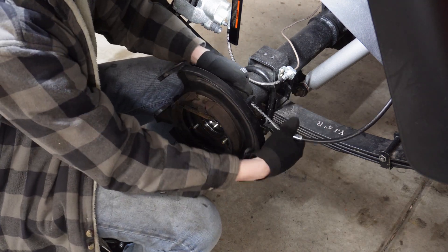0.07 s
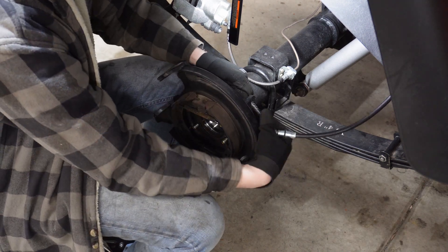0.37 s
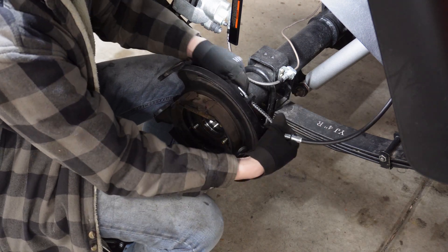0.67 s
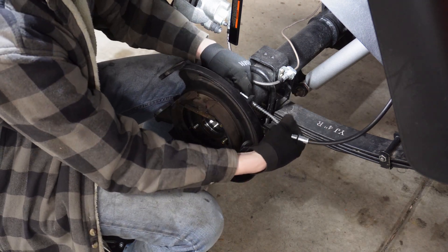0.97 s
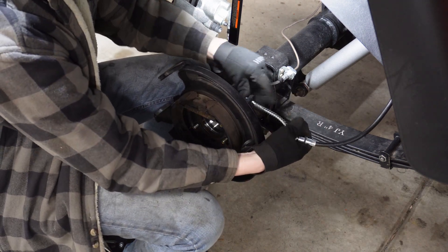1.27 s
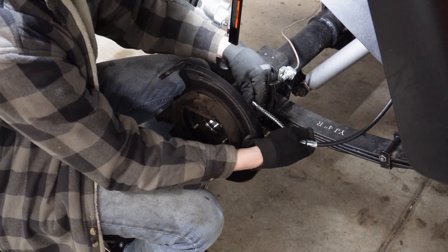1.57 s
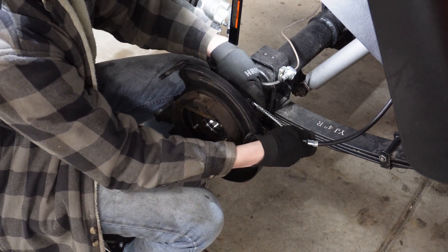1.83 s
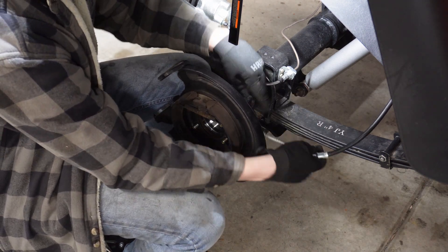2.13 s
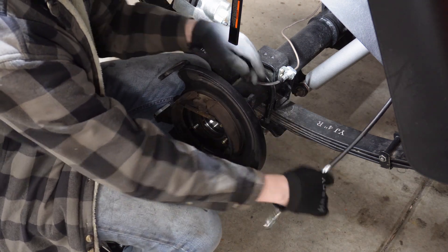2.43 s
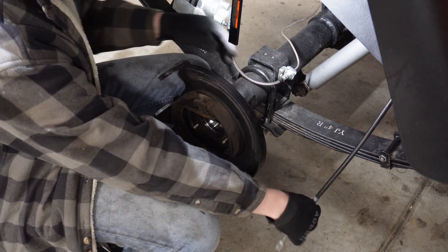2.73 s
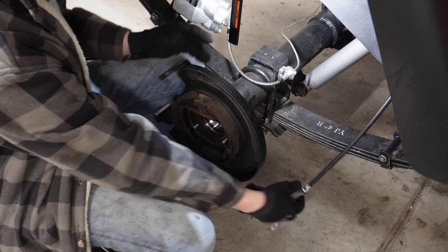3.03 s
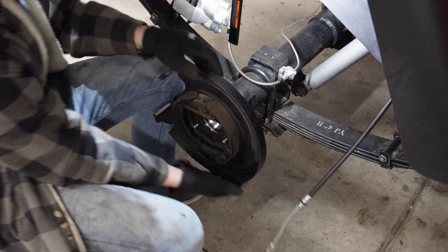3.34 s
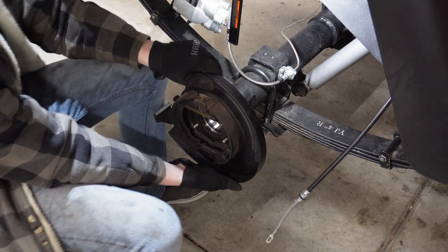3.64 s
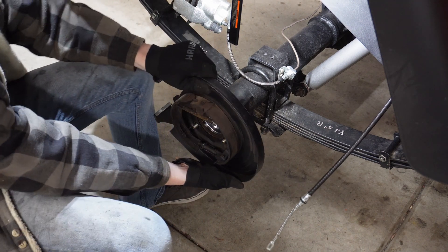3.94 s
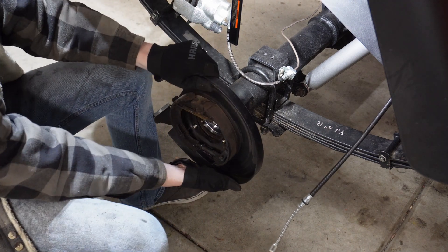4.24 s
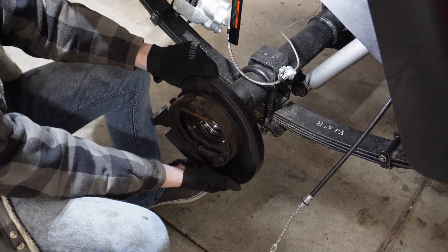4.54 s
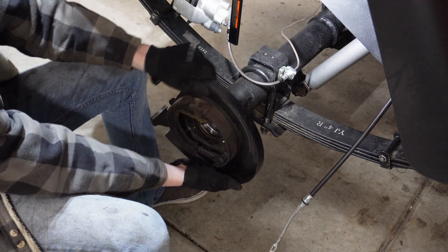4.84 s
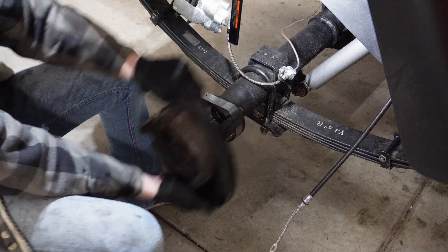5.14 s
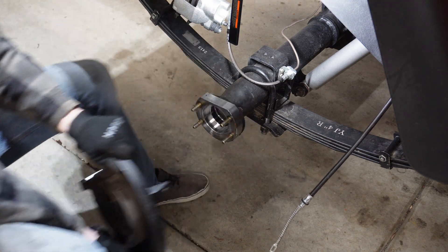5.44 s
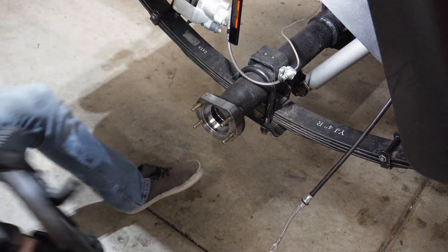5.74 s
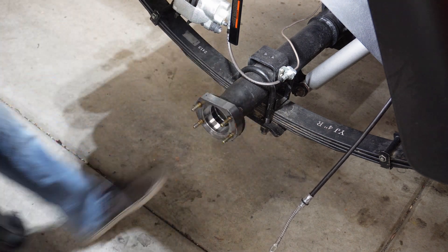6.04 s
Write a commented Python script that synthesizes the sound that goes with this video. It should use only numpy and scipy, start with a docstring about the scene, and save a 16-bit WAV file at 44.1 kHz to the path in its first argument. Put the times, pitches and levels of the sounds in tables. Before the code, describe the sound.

Light metal clicks, a sharp rasp and a dull bump, then bursts of steel clanking and a gritty footstep in a garage.

```python
"""A mechanic kneels in a garage, working a brake cable out of a steel backing plate. The end fitting
clicks and jingles on the plate; at 2 s the clip snaps free, the cable rasps through its hole, and a hollow
panel takes a dull bump. He shifts with a rustle and a scuff, then from 3.9 s rocks the plate on the axle
studs in short bursts of clanks until it slides off, ringing. He gets up: a shoe grinds round on gritty
concrete under a faint, thin whirr, and a trouser leg swishes past."""
import sys
import numpy as np
from scipy import signal
from scipy.fft import rfft, irfft
from scipy.io import wavfile

SR = 44100
rng = np.random.default_rng(int(sys.argv[2]) if len(sys.argv) > 2 else 0)


def waveform_to_disk(signal):
    """Save audio, clipped to [-1, 1], as 16-bit WAV at the path in sys.argv[1]."""
    frames = np.transpose(np.atleast_2d(signal))
    scaled = np.clip(frames, -1, 1) * 32767
    samples = np.round(scaled).astype(np.int16)
    wavfile.write(sys.argv[1], SR, samples)


N = 277830
TIME = np.arange(N) / SR
EQ_GRID_HZ = np.maximum(np.fft.rfftfreq(4096, 1 / SR), 10)

# Table levels are pre-fader: each layer sets its own gain. EQ curves give tone only.
# the plate knocks on its studs: start_s, level_db, tilt_db_per_octave, chatter_s
CLANKS = [(3.921, -8.5, -0.5, 0.0058), (3.935, -3.5, 1, 0.019), (3.949, -2, 0.5, 0.0064),
          (4.12, -10.5, 0.5, 0.0032), (4.132, -14, -2.5, 0.0087), (4.141, -4, -1, 0.014),
          (4.157, -5, 0, 0.0036), (4.321, -19.5, 0.5, .003), (4.328, -10.5, -1.5, 0.0027),
          (4.361, -8.5, -.5, 0.0086), (4.372, -8.5, -2, 0.0061), (4.385, -9, 0.5, 0.003),
          (4.396, -10, 2.5, 0.0094), (4.444, -8, 1, 0.0029), (4.707, -6, -0.5, 0.00079),
          (4.714, -12.5, -6, 0.0027), (4.824, -12.5, -1.5, 0.0037), (4.83, -18, -3, 0.0077),
          (4.857, -13.5, -4, 0.0092), (4.87, -10.5, -0.5, 0.0056), (4.889, -14.5, -0.5, 0.0046),
          (4.963, -10, 0, 0.0066)]
# hard tone of plate on stud: freq_hz, gain_db
CLANK_EQ = [(180, -37), (300, -30), (462, -20.5), (801, -12.5), (946, -5.5), (1040, -9), (1170, -1.5),
            (1460, -2), (1640, -4), (1840, -3.5), (3460, -5.5), (3830, -7.5), (7820, -22), (10000, -20),
            (16000, -42)]
# choked ring of the plate held on its studs: pitch_hz, level_db, t60_s
GRIPPED_MODES = [(996, -9.5, 0.2), (1380, 3.5, 0.091), (1499, 4, 0.093), (1932, -3.5, 0.18),
                 (2270, -20, .07), (4000, 4, 0.058), (4250, 4.5, 0.048), (9930, -14, 0.098)]
# open ring of the free plate: pitch_hz, level_db, t60_s
FREE_MODES = [(1205, -10.5, 0.65), (1327, 10.5, 0.8), (1370, -10.5, 0.93), (1515, 9, 0.87),
              (1460, -15.5, 0.33), (1505, 5, 0.96), (1910, -12.5, .5), (2210, -13, .45),
              (2120, -11.5, 0.35), (2240, -12.5, .45), (2730, -9, 0.43), (2960, 5, 0.94),
              (3090, -0.5, 0.38), (3700, -9.5, .4), (5100, -11, .4), (5500, -9.5, 0.32), (6140, -12, 0.14),
              (7150, -15, 0.32)]
# the plate leaves the last stud: start_s, level_db, tilt_db_per_octave
RELEASE = [(5.075, -33.5, 17.5)]
# steel slides on steel: peak_s, level_db, rise_s, fall_s
SLIDES = [(0.012, -25, 0.032, 0.12), (3.81, -34, 0.05, 0.39), (4.7, -37, 0.021, 0.024),
          (5.0, -35, 0.099, 0.09), (5.085, -26, 0.074, 0.055)]
# tugs on the plate shake the axle: peak_s, level_db
TUGS = [(0.02, -36), (3.99, -34), (4.18, -37), (4.41, -35.5), (4.73, -44), (4.9, -32.5), (5.08, -29.5)]
# low rumble of the axle: freq_hz, gain_db
AXLE_EQ = [(21, -48), (35, -21), (86, 2), (130, -14), (227, 4), (268, -1.5), (300, 1), (438, -9.5),
           (500, -9.5), (650, -5.5), (1100, -120)]

# the clip snaps out of the plate: start_s, level_db, tilt_db_per_octave, chatter_s
CLIP_SNAP = [(2.071, -7.5, 5, 0.0041)]
# short pulls draw the cable through its hole: peak_s, level_db, rise_s, fall_s, treble_db
PULLS = [(2.124, -12.5, 0.11, 0.095, 1), (2.373, -12, 0.039, 0.024, -14), (2.41, -9, .05, 0.044, -3)]
# biting tone of the cable on the hole's edge: freq_hz, gain_db
RASP_EQ = [(120, -56.5), (200, -34.5), (236, -31.5), (416, -38), (696, -21.5), (933, -19), (1180, -6.5),
           (1500, 0), (1680, -10.5), (2130, -2.5), (2560, -8), (3310, -5.5), (7270, -13), (9750, -17.5),
           (16000, -40)]
# hard catches of the cable ring the plate: start_s, level_db, tilt_db_per_octave
CATCHES = [(2.072, -19.5, 20.5), (2.128, -27, 24), (2.412, -17.5, -9)]

# the end fitting taps the plate: start_s, level_db, tilt_db_per_octave, chatter_s
FITTING_TAPS = [(0.009, -28, 10.5, .008), (0.044, -34.5, 12, 0.014), (0.069, -25, 4.5, 0.0063),
                (0.321, -26.5, 3, .0065), (0.494, -29.5, 4, 0.0023), (0.616, -35.5, -2.5, 0.018),
                (0.862, -25, 2.5, .012), (0.91, -11.5, 2, 0.0067), (1.078, -15, 1, .006),
                (1.12, -15.5, 1.5, .006), (1.275, -23.5, 1, 0.01), (1.99, -29, 1, .017),
                (2.01, -18.5, 5.5, 0.011), (2.044, -20, 1.5, 0.0092)]
# broad clack of a tap: freq_hz, gain_db
FITTING_EQ = [(88, -52), (150, -23.5), (291, -9.5), (484, -19.5), (888, -10.5), (1080, -13.5), (1240, -6),
              (1480, -6.5), (2650, -6), (5910, -23), (9630, -31.5), (11700, -32), (14500, -39),
              (16000, -42.5)]
# jingle after a tap: pitch_hz, level_db, t60_s
FITTING_MODES = [(1210, 2, .5), (1296, 2, 0.62), (1690, -10, 0.5), (2400, -9.5, .55), (2540, -3, .5),
                 (2740, 3, 0.45), (3020, -5, .4), (3250, -4.5, 0.99), (4460, -7, .4), (5873, -16, 0.33),
                 (7740, -16.5, .4), (8300, -18, .4), (9800, -15, 0.31), (11010, -19, .35),
                 (11140, -21, .35), (14500, -20.5, 0.2)]

# bumps on the panel: start_s, level_db, tilt_db_per_octave, chatter_s
BUMPS = [(2.622, -29, -4, 0.018), (2.634, -10, 3, .012), (2.639, -10, 0, 0.018), (2.652, -20.5, 0, 0.008),
         (2.666, -13.5, 1.5, 0.027), (2.728, -28, -2, 0.018)]
# hollow body of the panel: freq_hz, gain_db
PANEL_EQ = [(35, -62), (60, -46), (110, -22), (190, -10), (270, -9), (340, -10), (540, -1), (770, -9),
            (900, -7), (1370, -12), (2300, -19), (7000, -45), (12000, -62)]

# the sole scuffs as the leg shifts: peak_s, level_db
SCUFFS = [(0.32, -41.5), (3.19, -34), (3.495, -32.5), (3.62, -38), (3.81, -36.5)]
# the sole turns under his weight: time_s, level_db
PIVOT_FADER = [(5.25, -39), (5.35, -28), (5.62, -20), (5.84, -23.5), (6.02, -27), (6.12, -37), (6.3, -32.5)]
# the sole slips in jerks: start_s, level_db
SLIPS = [(3.195, -31), (3.488, -35), (3.619, -30.5), (5.339, -25), (5.381, -22.5), (5.413, -21.5),
         (5.456, -19), (5.542, -17), (5.651, -15.5), (5.766, -15), (5.822, -18)]
# low-mid groan of rubber on concrete: freq_hz, gain_db
SOLE_EQ = [(35, -32), (70, -34), (140, -9.5), (220, -18), (320, -12), (380, -8.5), (425, 2.5), (485, 2),
           (560, -2), (620, -5.5), (690, -1.5), (755, 4), (840, -11), (960, -18), (1500, -18), (4000, -64)]
# grit is crushed under the shoe: peak_s, level_db
CRUNCHES = [(3.43, -38.5), (5.65, -27), (5.84, -30.5)]
# sandy tone of the grit: freq_hz, gain_db
GRIT_EQ = [(470, -15.5), (800, -11.5), (876, -9.5), (1320, -12.5), (1760, -10.5), (3090, -15.5),
           (3390, -21), (7000, -33.5), (9100, -38), (15400, -120)]

# sleeves and jeans rub: peak_s, level_db, rise_s, fall_s
RUSTLES = [(0.32, -50, 0.084, .1), (0.45, -51, 0.07, 0.41), (3.2, -55, 0.56, 0.31), (3.4, -41, 0.16, 0.52),
           (3.64, -43, 0.043, 0.036), (3.82, -53, 0.042, 0.41), (5.2, -54, 0.24, 0.33),
           (5.66, -52, .07, 0.14), (5.89, -48, 0.064, 0.17)]
# zips and buttons tick: start_s, level_db
TICKS = [(1.223, -30), (3.33, -30), (3.403, -26.5), (3.638, -26), (5.266, -33), (5.838, -36)]
# crisp tone of the cloth: freq_hz, gain_db
CLOTH_EQ = [(1180, -15), (2000, -6.5), (2490, -9), (2910, -9.5), (4190, -10.5), (6530, -10), (14700, -23.5),
            (16000, -28)]
# a trouser leg sweeps past: peak_s, level_db
SWISHES = [(6.085, -34.5), (6.28, -40.5)]
# airy tone of the sweep: freq_hz, gain_db
SWISH_EQ = [(710, -40), (1200, -4), (1490, -7.5), (2400, -2.5), (3950, -10.5), (4310, -10.5), (4910, -13),
            (8910, -11), (14700, -18), (16000, -29)]

# the whirr swells and drops away: time_s, level_db
WHIRR_FADER = [(5.05, -59), (5.2, -59), (5.6, -52.5), (5.95, -48), (6.05, -71)]
# narrow treble peaks of the whirr: freq_hz, gain_db
WHIRR_EQ = [(3000, -25), (3900, 2.5), (4600, -34), (7800, -24), (8600, -1), (9100, -16), (9800, -17),
            (13500, -26), (15000, -14), (16000, -20)]
# dark bed of room air: freq_hz, gain_db
AIR_EQ = [(20, -13), (45, -13), (60, -7), (90, -12), (150, -12), (230, -7), (330, -12), (700, -15),
          (1500, -19), (4000, -27), (8000, -33), (15000, -37)]
# reverb time of the garage: freq_hz, t60_s
GARAGE_T60 = [(150, 0.82), (400, .7), (1000, 0.76), (2800, 0.56), (7000, 0.51), (14000, 0.17)]


def plate(studs=4):
    """The gripped plate knocks on its studs in turn, slides along them and rings free; the axle rumbles."""
    knocks = 0
    for stud in range(studs):  # each spot radiates into the room in its own way
        hits = blows(CLANKS[stud::studs], first_contact=0.33, rise_s=0.00033)
        knocks += garage(eq(hits, CLANK_EQ) * undb(-9), wet_db=-5, build_s=0.00071)
    choked_ring = ringing(CLANKS, GRIPPED_MODES, hardness=0.51) * undb(-22)
    open_ring = ringing(RELEASE, FREE_MODES, hardness=1) * undb(-22.5)
    rub = eq(friction(rate_hz=1200, spread_db=3), CLANK_EQ) * strokes(SLIDES) * undb(-6)
    tugs = strokes(TUGS, rise_s=0.069, fall_s=0.25)
    rumble = eq(rng.standard_normal(N), AXLE_EQ) * tugs * undb(-4.5)
    return knocks + choked_ring + open_ring + rumble + garage(rub, wet_db=-5.5, build_s=0.002)


def cable():
    """The clip snaps out and the wound cable rasps over the edge of the hole; the plate rings on."""
    rasp = friction(rate_hz=5000, spread_db=1.5)
    body = signal.sosfilt(signal.butter(1, 3500, fs=SR, output="sos"), rasp)
    treble = rasp - body
    pulled = 0
    for peak_s, level_db, rise_s, fall_s, treble_db in PULLS:
        pull = stroke(peak_s, level_db, rise_s, fall_s)
        trail = stroke(peak_s, level_db - 26.5, rise_s, fall_s=0.28)  # the cable drags on softly
        pulled += np.maximum(pull, trail) * (body + treble * undb(treble_db))
    unclipped = TIME > CLIP_SNAP[0][0]
    snap = blows(CLIP_SNAP, first_contact=0.2, rise_s=0.00025)
    scrape = eq(pulled * unclipped + snap, RASP_EQ) * undb(-1)
    ring = ringing(CATCHES, FREE_MODES, hardness=1) * undb(-18)
    return garage(scrape, wet_db=-4, build_s=0.0037) + shimmer(scrape) * undb(-13.5) + ring


def shimmer(scrape, modes=70, low_hz=1807, high_hz=9150, t60_s=0.24):
    """A scrape wakes the closely spaced high modes of sheet steel."""
    t = TIME[:SR]
    jitter, phase = rng.random((modes, 2)).T
    pitch_hz = low_hz * (high_hz / low_hz) ** ((np.arange(modes) + jitter) / modes)
    cluster = np.cos(2 * np.pi * (pitch_hz[:, None] * t + phase[:, None])).sum(0)
    return through(scrape, unit(cluster * undb(-60 * t / t60_s)))


def fitting():
    """The cable's end fitting taps the plate: a broad clack, and a jingle that light taps hardly wake."""
    taps = blows(FITTING_TAPS, first_contact=0.15, rise_s=0.00066)
    clack = eq(taps, FITTING_EQ) * undb(-5)
    expansion = 1.17  # dB of ring per dB of tap
    strikes = [(start_s, expansion * level_db, tilt) for start_s, level_db, tilt, _ in FITTING_TAPS]
    jingle = ringing(strikes, FITTING_MODES, hardness=0.55) * undb(-24.5)
    return garage(clack, wet_db=-4.5, build_s=0.003) + jingle


def panel():
    """A bumped hollow panel gives a dull, quickly damped boom."""
    bumps = blows(BUMPS, first_contact=0.13, rise_s=0.00156)
    return garage(eq(bumps, PANEL_EQ) * undb(3.5), wet_db=-6.5, build_s=0.0037)


def shoe(slip_tilt=0.5, slip_chatter_s=0.0053):
    """A rubber sole drags, sticks and slips over concrete, crushing grit as it goes."""
    scuff = strokes(SCUFFS, rise_s=0.069, fall_s=0.14)
    pivot = fader(PIVOT_FADER)
    drag = friction(rate_hz=500, spread_db=4.5) * (scuff + pivot) * undb(-7)
    slips = [(*slip, slip_tilt, slip_chatter_s) for slip in SLIPS]
    jerks = blows(slips, first_contact=2, rise_s=0.00051)
    crush = scuff * undb(-4.5) + pivot * undb(-17) + strokes(CRUNCHES, rise_s=0.022, fall_s=0.1)
    grit = friction(rate_hz=1000, spread_db=1) * crush * undb(-3.5)
    return garage(eq(drag + jerks, SOLE_EQ) + eq(grit, GRIT_EQ), wet_db=-6.5, build_s=0.012)


def clothes(tick_tilt=-3, tick_chatter_s=0.0052):
    """Shirt and jeans rustle fibre by fibre, zips and buttons tick, and a trouser leg swishes."""
    rustle = friction(rate_hz=2500, spread_db=5) * strokes(RUSTLES) * undb(-3.5)
    touches = [(*tick, tick_tilt, tick_chatter_s) for tick in TICKS]
    ticks = blows(touches, first_contact=0.44, rise_s=0.00038) * undb(-9)
    sweeps = strokes(SWISHES, rise_s=0.068, fall_s=0.097)
    swish = friction(rate_hz=8100, spread_db=4.5) * sweeps * undb(1)
    return garage(eq(rustle + ticks, CLOTH_EQ) + eq(swish, SWISH_EQ), wet_db=-6, build_s=0.0021)


def whirr():
    """A thin, grainy whirr high in the treble."""
    grains = friction(rate_hz=500, spread_db=4)
    return eq(grains, WHIRR_EQ) * fader(WHIRR_FADER) * undb(-7.5)


def room_tone():
    """Still air lays a faint, steady bed of dark noise."""
    return eq(rng.standard_normal(N), AIR_EQ) * undb(-61.5)


def garage(x, wet_db, build_s):
    """Hard walls add a diffuse tail that builds up quickly and loses its treble first."""
    t = TIME[:SR]
    spectrum = rfft(rng.standard_normal(SR))
    bands_hz = 125 * 2. ** np.arange(8)
    log_hz = np.log(np.maximum(np.arange(len(spectrum)), 1))
    tail = 0
    for share, t60_s in zip(np.eye(len(bands_hz)), on_log_axis(GARAGE_T60, bands_hz)):
        band = irfft(spectrum * np.interp(log_hz, np.log(bands_hz), share), SR)
        tail += band * undb(-60 * t / t60_s)
    bloom = 1 - np.exp(-t / build_s)
    return x + undb(wet_db) * through(x, unit(tail * bloom))


def blows(rows, first_contact, rise_s):
    """Contact force: each blow is a sharp touch and a burst of chatter, tilted bright or dull."""
    t = TIME[:len(EQ_GRID_HZ) * 2]
    force = np.zeros(N + len(t))
    octaves = np.log2(np.maximum(EQ_GRID_HZ, 300) / 2500)
    attack = 1 - np.exp(-t / rise_s)
    for start_s, level_db, tilt, chatter_s in rows:
        push = unit(rng.standard_normal(len(t)) * attack * np.exp(-t / chatter_s))
        push[int(rise_s * SR)] += first_contact
        start = int(start_s * SR)
        force[start:start + len(t)] += through(unit(push), minimum_phase(tilt * octaves)) * undb(level_db)
    return force[:N] * np.sqrt(0.003 * SR)


def ringing(rows, modes, hardness, attack_s=0.002):
    """Each blow starts the modes of a steel part; brighter blows favour the high ones."""
    t = TIME[:SR]
    pitch_hz, mode_db, t60_s = np.transpose(modes)
    envelopes = (1 - np.exp(-t / attack_s)) * undb(-60 * t / t60_s[:, None])
    partials = envelopes * np.sin(2 * np.pi * pitch_hz[:, None] * t)
    octaves = np.log2(pitch_hz / 2500)
    ring = np.zeros(N + SR)
    for start_s, level_db, tilt, *_ in rows:
        start = int(start_s * SR)
        ring[start:start + SR] += undb(level_db + mode_db + hardness * tilt * octaves) @ partials
    return ring[:N]


def friction(rate_hz, spread_db):
    """Surfaces catch and release in random clicks of uneven size, at an rms of one."""
    catches = rng.random(N) < rate_hz / SR
    size = undb(spread_db * np.clip(rng.standard_normal(N), -2, 2))
    polarity = np.sign(rng.standard_normal(N))
    return unit(catches * size * polarity) * np.sqrt(N)


def stroke(peak_s, level_db, rise_s, fall_s):
    """Envelope of one movement: up 20 dB over the rise time, down 20 dB over the fall time."""
    from_peak = np.maximum((peak_s - TIME) / rise_s, (TIME - peak_s) / fall_s)
    return undb(level_db - 20 * np.minimum(from_peak, 10))


def strokes(rows, **shared_shape):
    """Envelope of several movements; rise and fall come from each row or are shared by all."""
    return sum(stroke(*row, **shared_shape) for row in rows)


def fader(curve, fade_s=0.06):
    """Ride the gain along a curve, fading in from silence and back out."""
    time_s, level_db = np.transpose(curve)
    points_s = np.r_[time_s[0] - fade_s, time_s, time_s[-1] + fade_s]
    return np.interp(TIME, points_s, np.r_[0, undb(level_db), 0])


def eq(x, curve):
    """Colour a sound with an EQ curve scaled to unit energy."""
    return through(x, unit(minimum_phase(on_log_axis(curve, EQ_GRID_HZ))))


def minimum_phase(gain_db):
    """Tightest causal impulse response with these gains on the EQ grid."""
    cepstrum = irfft(np.log(undb(gain_db)))
    half = len(cepstrum) // 2
    cepstrum[1:half] *= 2
    cepstrum[half + 1:] = 0
    return irfft(np.exp(rfft(cepstrum)))[:half]


def on_log_axis(curve, freq_hz):
    """Read a curve at any frequency, interpolating in octaves."""
    known_hz, values = np.transpose(curve)
    return np.interp(np.log(freq_hz), np.log(known_hz), values)


def through(x, response):
    """Pass a sound through an impulse response."""
    return signal.fftconvolve(x, response)[:len(x)]


def unit(x):
    """Scale to an energy of one."""
    return x / np.sqrt(np.sum(x ** 2))


def undb(db):
    """Decibels to gain."""
    return 10 ** (np.asarray(db) / 20)


def scene():
    """Mono mix of the metalwork and the mechanic's movements over room tone."""
    return (fitting() + cable() + plate() + panel() + shoe() + clothes() + whirr() + room_tone())[None]


def record(dry):
    """Clip any peaks over full scale, then cut the top steeply at 16 kHz."""
    high_cut = signal.ellip(10, 0.1, 70, 16000, fs=SR, output="sos")
    return signal.sosfilt(high_cut, np.clip(dry, -1, 1))


dry = scene()
out = record(dry)
waveform_to_disk(out)
```